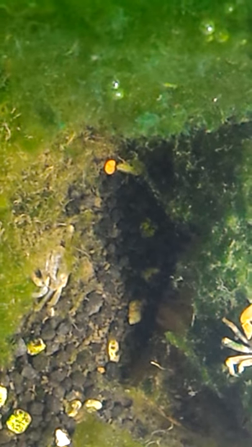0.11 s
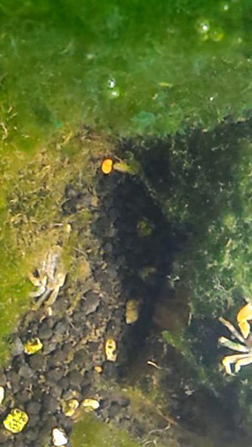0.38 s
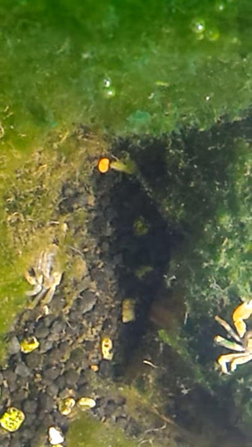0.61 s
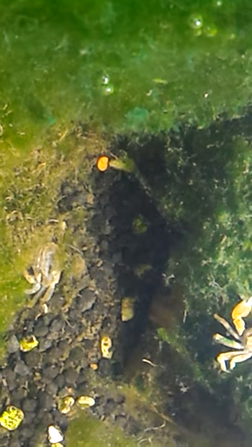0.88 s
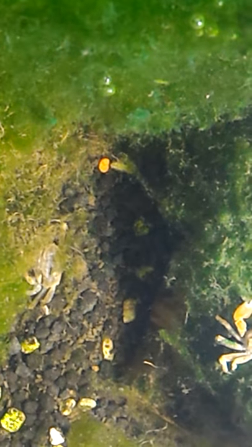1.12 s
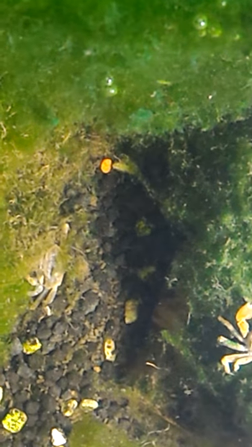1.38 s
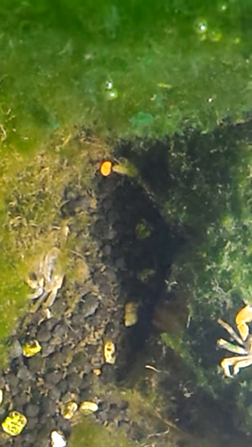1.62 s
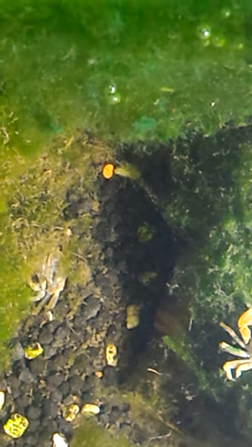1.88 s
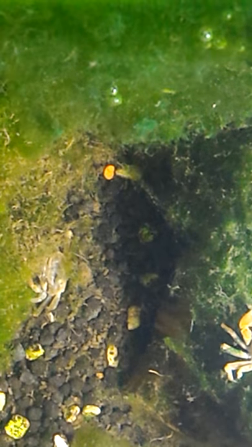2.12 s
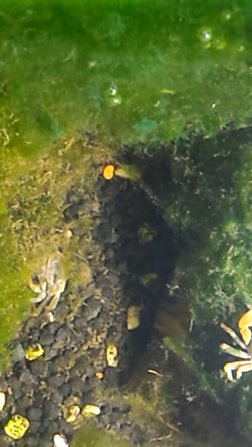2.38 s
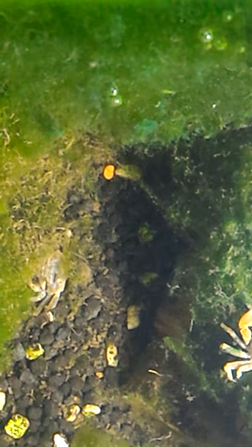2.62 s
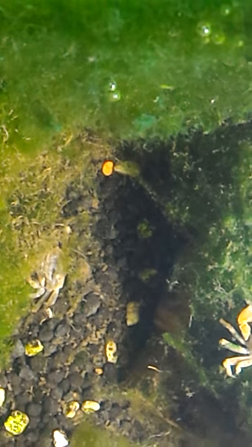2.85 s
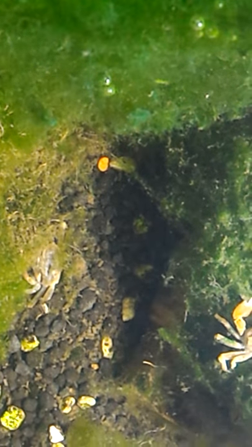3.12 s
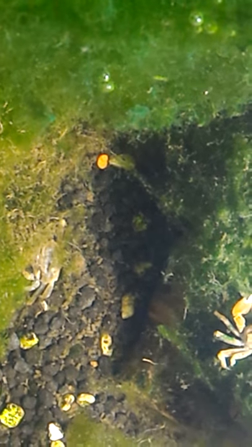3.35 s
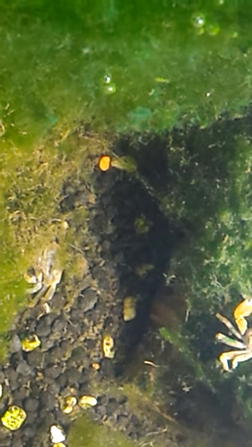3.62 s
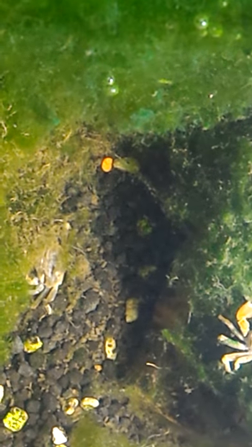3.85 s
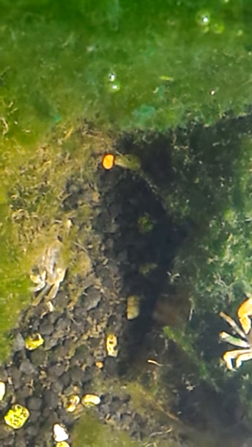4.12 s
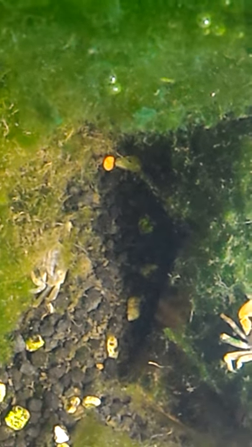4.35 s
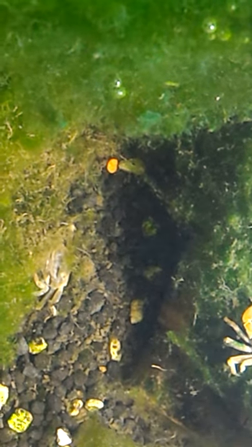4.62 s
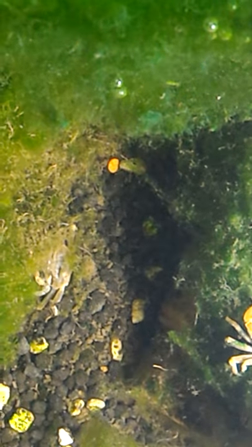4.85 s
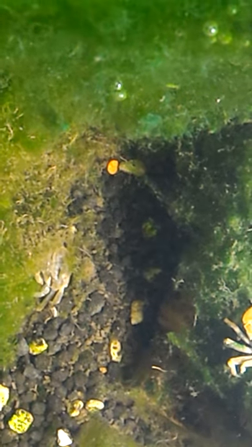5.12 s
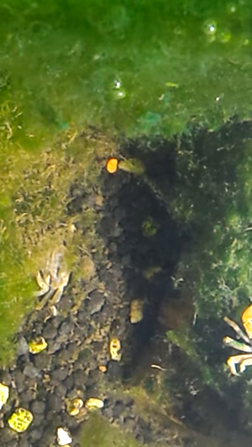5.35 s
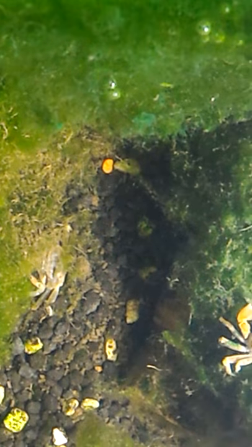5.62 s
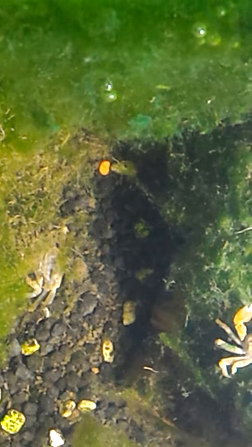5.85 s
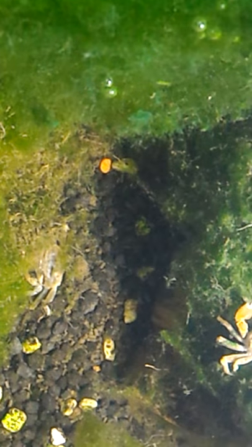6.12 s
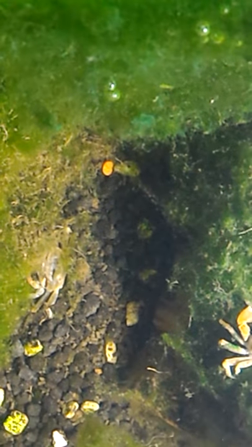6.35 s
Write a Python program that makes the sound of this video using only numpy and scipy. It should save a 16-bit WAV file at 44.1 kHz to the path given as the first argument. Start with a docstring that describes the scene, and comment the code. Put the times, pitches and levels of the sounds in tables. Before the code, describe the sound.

In a quiet room, an aquarium pump drones with a steady low electrical hum and a thin buzz. Over it lies a soft hiss of moving water, flickering slightly, with tiny bubbles fizzing and popping, most clearly in the first second and a half. A wall clock beats faintly once a second, dull tock then brighter tick. One microphone picks it all up with slight noise of its own.

```python
"""A quiet room with an aquarium: its pump hums on the mains, a stack of steady sine tones with a faint buzz.
Slightly unsteady fainter tones and a room rumble of filtered noise lie under the hiss of moving water,
which is noise that drifts and flickers. Small bubbles pop at the surface as brief rising tones and puffs
of noise. A wall clock beats once a second, tock and tick in turn, as short rings of its case.
One microphone adds its own faint noise."""
import sys
import numpy as np
from scipy import signal
from scipy.fft import rfft, irfft
from scipy.io import wavfile
from scipy.ndimage import uniform_filter1d

SR = 44100
rng = np.random.default_rng(int(sys.argv[2]) if len(sys.argv) > 2 else 0)


def wav_record(signal):
    """Record a signal, one row per channel, as 16-bit PCM in the file named by sys.argv[1]."""
    frames = np.transpose(np.atleast_2d(signal))
    bounded = np.clip(frames, -1, 1)
    # unit amplitude maps onto the largest positive 16-bit level
    quanta = np.round(bounded * 32767).astype(np.int16)
    wavfile.write(sys.argv[1], SR, quanta)


def invert_db(level):
    """Linear amplitude ratio for a level in decibels (20 dB per decade), elementwise."""
    return 10 ** (np.asarray(level, dtype=float) / 20)


N = 285762  # length in samples
TIME, BINS_HZ = np.arange(N) / SR, np.fft.rfftfreq(N, 1 / SR)


def evened(x):
    """Scales to rms 1."""
    return x / np.sqrt(np.mean(x ** 2) + 1e-20)


def read(points, hz):
    """Reads a level between the listed points, on a log-frequency axis."""
    point_hz, value = np.transpose(points)
    return np.interp(np.log(hz + 1), np.log(point_hz + 1), value)


def add(mix, s, sound):
    """Mixes a sound in at time s, in seconds."""
    part = mix[round(s * SR):][:len(sound)]
    part += sound[:len(part)]


def coloured(x, colour_db):
    """Gives white noise of rms 1 a spectrum in dB per Hz."""
    return irfft(rfft(x) * invert_db(colour_db), N) * np.sqrt(SR / 2)


def ring(hz, t60, rise_s, glide=0):
    """A decaying tone with a soft start and an envelope peak of 1; its pitch rises by the share glide over t60."""
    t = np.arange(2200) / SR
    envelope = (1 - np.exp(-t / rise_s)) ** 2 * invert_db(-60 * t / t60)
    tone = np.sin(2 * np.pi * hz * (t + glide * t ** 2 / t60 / 2))
    return envelope / envelope.max() * tone


def snap(t60=0.035):
    """A short puff of fading treble noise, peak near 1."""
    band = signal.butter(2, [2800 / SR * 2, 8500 / SR * 2], "band")
    puff = signal.lfilter(*band, rng.standard_normal(800))
    return evened(puff) * invert_db(-60 * np.arange(800) / SR / t60) / 2


def pump():
    """Tones at multiples of the mains, each at its own phase; the buzz lines are each of chance strength."""
    mains_hz = 50.0287
    # the pump's hum through tank and stand: (multiple of the mains, level [dB rms])
    hum = [(1, -47.9), (2, -58.0), (3, -69.8), (4, -56.1), (5, -56.9), (6, -64.5), (7, -56.7), (8, -71.0),
           (9, -66.3), (10, -77.5), (11, -73.8), (13, -77.2), (14, -81.9), (15, -78.2), (16, -79.1),
           (17, -72.6), (18, -82.2), (19, -78.8), (20, -78.9), (21, -81.4), (27, -84.2)]
    # the coil's thin buzz on the higher multiples: (frequency [Hz], level of a typical line [dB rms])
    buzz = [(1150, -87), (1500, -97), (1850, -91), (2500, -100), (3300, -102), (3750, -94), (5500, -94),
            (6100, -105), (7200, -103)]
    hum_orders, hum_db = np.transpose(hum)
    buzz_orders = np.setdiff1d(np.arange(22, 145), hum_orders)
    chance = np.sqrt(rng.exponential(1, len(buzz_orders)))
    buzz_gains = chance * invert_db(read(buzz, buzz_orders * mains_hz))
    orders = np.r_[hum_orders, buzz_orders]
    gains = np.r_[invert_db(hum_db), buzz_gains]
    # one mains cycle is drawn once, then read over and over
    turns, cycle = rng.random(len(orders)), np.linspace(0, 1, num=8193)
    tones = np.sin(2 * np.pi * (np.outer(orders, cycle) + turns[:, None]))
    wave = np.sqrt(2) * gains @ tones
    return np.interp(mains_hz * TIME % 1, cycle, wave)


def drones():
    """Tones whose phase wanders slowly, which blurs each line to its width."""
    # fainter tones off the mains multiples: (frequency [Hz], width [Hz], level [dB rms])
    drone_lines = [(27.1, 1.1, -70.5), (57.4, 0.44, -70.5), (93.7, 0.92, -73.5), (191.5, .6, -73),
                   (264, 1.47, -73.5)]
    out = np.zeros(N)
    for hz, width, db in drone_lines:
        wander = np.cumsum(rng.standard_normal(N)) * np.sqrt(2 * np.pi * width / SR)
        wander = uniform_filter1d(wander, size=2000)
        out += np.sqrt(2) * invert_db(db) * np.sin(2 * np.pi * (hz * TIME + rng.random()) + wander)
    return out


def rumble():
    """Even low noise coloured by the room's lowest modes, fading out above the last one."""
    # the room's low noise, before the fade: (frequency [Hz], level [dB per Hz])
    rumble_levels = [(8, -101), (17, -78), (26, -67), (33, -74), (40, -79.5), (50, -69), (70, -81.5),
                     (93, -77.5), (125, -83), (165, -79.5), (210, -89), (260, -81.5), (330, -88.5),
                     (400, -91.5), (480, -90.5)]
    fade_db = -10 * np.log10(1 + (BINS_HZ / 560) ** 12)
    return coloured(rng.standard_normal(N), read(rumble_levels, BINS_HZ) + fade_db)


def hiss(patchy_db=1.6, flicker_db=1.02, ripple_db=1.):
    """Moving water: noise with drifting patches and a flicker that the whole treble shares."""
    # the water's noise, before the shaping below: (frequency [Hz], level [dB per Hz])
    hiss_levels = [(500, -93), (680, -99), (1400, -99), (2250, -100), (2650, -105), (3050, -105),
                   (3400, -103), (3850, -105), (5400, -105), (6200, -108), (7900, -106), (9000, -112),
                   (10500, -120), (15000, -130)]
    # where tank, lid and tubing lift the hiss: (frequency [Hz], width [Hz], lift [dB])
    tank = [(920, 250, 3), (1206, 130, 6), (1620, 85, 1.5), (1856, 67, 3), (1980, 130, 1), (2150, 150, 2.5),
            (2900, 100, 0.5), (3160, 140, 3.5), (3354, 140, 5), (3600, 140, 3), (4200, 100, 4.5),
            (4500, 67, 0), (4690, 72, 5), (4940, 120, 4), (5400, 310, 1), (5940, 92, 0)]
    # swells of the hiss around 2 kHz: (time [s], half-length [s], lift [dB])
    gurgle = [(0.05, .3, 1), (2.78, 0.32, 4), (5.2, .25, 2)]

    # changes over time, in steps of 128 samples
    frames, hz = N // 128 + 5, np.fft.rfftfreq(512, 1 / SR)[:, None]
    patches = uniform_filter1d(rng.standard_normal((frames, 257)), size=14, axis=0)
    patches = evened(uniform_filter1d(patches, size=12, axis=1)).T
    flicker = evened(uniform_filter1d(rng.standard_normal(frames), size=10))
    treble_share = hz / (hz + 2500)
    restless_db = treble_share * (patchy_db * patches + flicker_db * flicker)
    t = np.arange(frames) * 128 / SR
    swell_db = sum(db * np.exp(-((t - s) / half_s) ** 2) for s, half_s, db in gurgle)
    gurgle_db = swell_db * np.exp(-((hz - 2100) / 500) ** 2)
    z = signal.stft(rng.standard_normal(128 * (frames - 1)), nperseg=512, noverlap=384)[2]
    z *= invert_db(restless_db + gurgle_db)
    restless = signal.istft(z, nperseg=512, noverlap=384)[1][:N]

    # the steady colour
    tank_db = sum(db * np.exp(-(2 * (BINS_HZ - f) / width) ** 2) for f, width, db in tank)
    # near reflections leave a fine fixed ripple, some 40 Hz wide
    ripple = uniform_filter1d(rng.standard_normal(len(BINS_HZ)), size=200)
    ripple = evened(uniform_filter1d(ripple, size=200))
    low_cut_db = -10 * np.log10(1 + (560 / (BINS_HZ + 1)) ** 12)
    return coloured(restless, read(hiss_levels, BINS_HZ) + tank_db + ripple_db * ripple + low_cut_db)


def bubbles(cycles=45, glide=0.049, spread_db=5.0, clump_db=6):
    """Each bubble rings briefly at the pitch of its size, for a set number of cycles; random ones clump."""
    # the clearest bubbles, each with a snap as the film bursts:
    # (time [s], frequency [Hz], peak [dB], snap level [dB])
    pops = [(.141, 6370, -61, -57), (.316, 6550, -58, -57), (.424, 3700, -58, -57), (.664, 2180, -53, -62),
            (.673, 3900, -60, -58), (.674, 2450, -59, -66), (.676, 2050, -57, -64),
            (.948, 4130, -58.5, -55), (.953, 6200, -59, -62), (1.326, 6500, -61, -57),
            (3.185, 7490, -59, -64), (3.356, 5730, -61, -60), (3.998, 7860, -58, -58),
            (4.281, 3620, -60, -62), (5.198, 1980, -59, -66), (5.214, 8100, -57, -56),
            (5.229, 5400, -59, -64), (5.800, 1460, -58, -68)]
    # random bubbles, before their spread in size: (frequency [Hz], peak [dB])
    fizz = [(900, -76.5), (2100, -82), (3000, -83), (4500, -80), (6200, -89), (8000, -83), (10500, -93)]
    fizz_per_s = 160
    snaps_per_s, snaps_db, snaps_spread_db = 14, -68, 6

    out = np.zeros(N)
    for s, hz, db, snap_db in pops:
        add(out, s, invert_db(snap_db) * snap())
        add(out, s, invert_db(db) * ring(hz, cycles / hz, 3 / hz, glide))
    # tiny bubbles that burst with no ring
    for place, chance in rng.random((round(snaps_per_s * N / SR), 2)):
        add(out, place * N / SR, invert_db(snaps_db + snaps_spread_db * chance) * snap())
    # random bubbles: each sample may start one, more likely inside a clump
    clumps = invert_db(clump_db * evened(uniform_filter1d(rng.standard_normal(N), size=2500)))
    starts = rng.random(N) < clumps / clumps.mean() * fizz_per_s / SR
    size = invert_db(spread_db * np.minimum(rng.exponential(1, N), 3)) * starts
    pitches = np.geomspace(900, 10500, num=30)
    kind = rng.integers(0, len(pitches), N)
    for k, hz in enumerate(pitches):
        bubble = invert_db(read(fizz, hz)) * ring(hz, cycles / hz, 3 / hz, glide)
        out += signal.oaconvolve(size * (kind == k), bubble)[:N]
    return out


def clock(rise_s=0.0015):
    """The stepping motor reverses each second, so dull tocks and bright ticks alternate in the case."""
    # tones of the clock case, before the spread between beats:
    # (frequency [Hz], time to fall 60 dB [s], peak on the tock [dB], peak on the tick [dB])
    case_tones = [(780, .02, -60, -68), (990, .024, -48.5, -63), (1170, .02, -59, -60),
                  (1600, .02, -65, -59), (1930, .02, -62, -60), (2250, .02, -68, -66),
                  (3000, .015, -70, -64), (3500, .015, -68, -63), (3980, .018, -70, -59),
                  (4250, .018, -70, -61), (4750, .015, -72, -64), (5550, .015, -72, -72)]
    first_beat_s, beat_s = .0916, 1.
    beat_spread_db = .5  # no two beats are quite alike
    out = np.zeros(N)
    for beat, s in enumerate(np.arange(first_beat_s, N / SR, beat_s)):
        strength_db = beat_spread_db * rng.standard_normal()
        for hz, t60, *peak_db in case_tones:
            add(out, s, invert_db(peak_db[beat % 2] + strength_db) * ring(hz, t60, rise_s))
    return out


def room(x, t60=0.23):
    """Echoes: a fading tail of sparse random taps, about 2000 a second, of total energy 1."""
    t = np.arange(SR // 2) / SR
    signs = rng.choice([-1., 1.], len(t))
    taps = signs * (rng.random(len(t)) < 2000 / SR)
    tail = taps * invert_db(-60 * t / t60) * (t > .004)
    return signal.fftconvolve(x, tail / np.linalg.norm(tail))[:N]


def scene():
    """All sources; the short sounds also ring in the room."""
    short = bubbles() + clock()
    steady = pump() + drones() + rumble() + hiss()
    return (steady + short + invert_db(-12.5) * room(short))[None]


def roll_off(x):
    """The treble ends steeply here."""
    return signal.sosfilt(signal.butter(12, 15660, fs=SR, output="sos"), x)


def record(dry):
    """One microphone, which adds its own faint steady noise."""
    # the microphone's noise, before its low cut: (frequency [Hz], level [dB per Hz])
    microphone = [(500, -110), (4000, -115), (10000, -117), (15500, -121)]
    low_cut_db = -10 * np.log10(1 + (500 / (BINS_HZ + 1)) ** 4)
    own_noise = coloured(rng.standard_normal(N), read(microphone, BINS_HZ) + low_cut_db)
    return roll_off(dry + own_noise)


dry = scene()
out = record(dry)
wav_record(out)
```